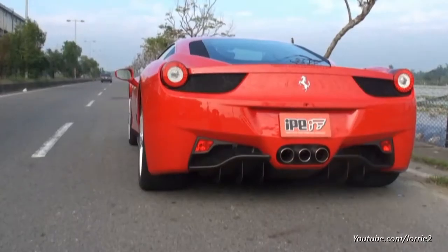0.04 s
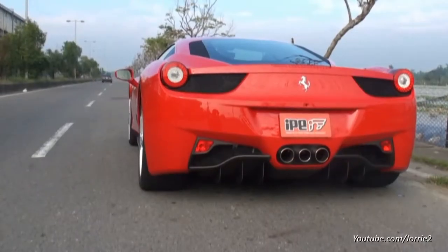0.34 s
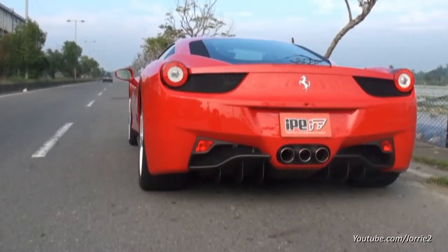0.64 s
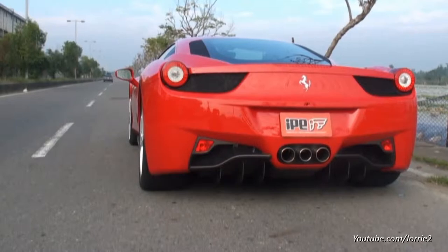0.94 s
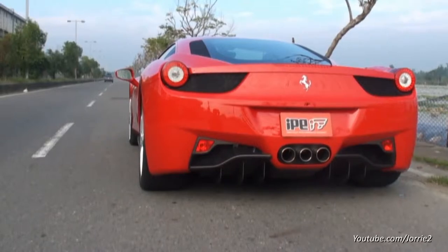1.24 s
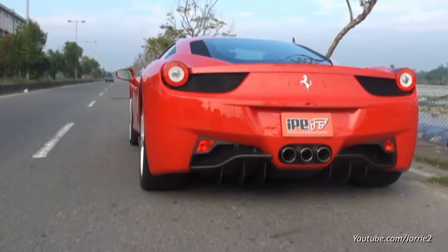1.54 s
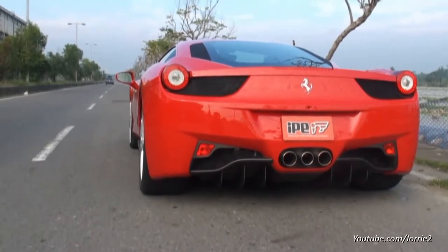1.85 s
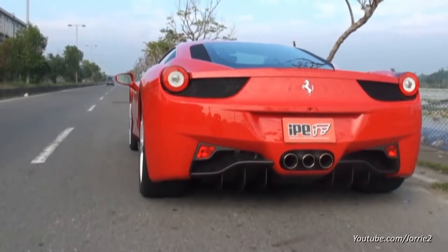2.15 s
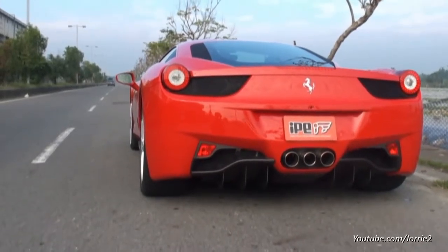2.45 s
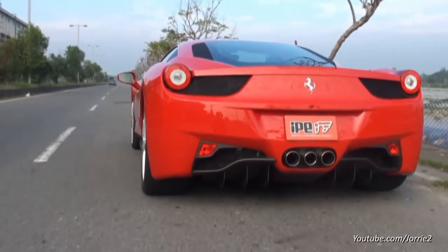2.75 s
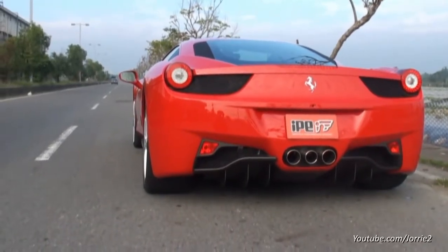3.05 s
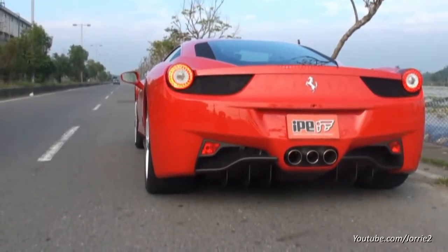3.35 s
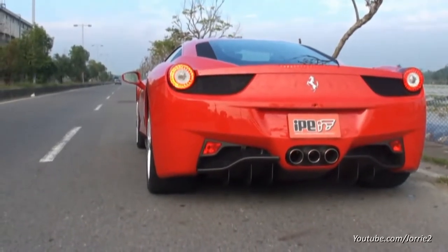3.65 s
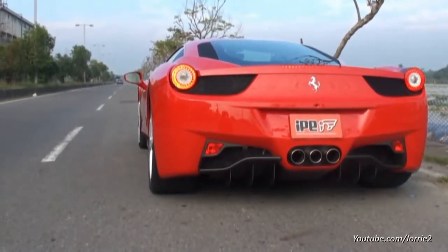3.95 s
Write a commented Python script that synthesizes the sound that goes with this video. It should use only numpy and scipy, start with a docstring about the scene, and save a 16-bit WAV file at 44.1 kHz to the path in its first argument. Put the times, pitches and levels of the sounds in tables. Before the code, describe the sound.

Heard close behind the exhaust by a road, a sports car gives two quick, raspy revs. Each climbs to a crackle, then sinks more slowly into a cluster of pops and an uneven burble.

```python
"""V8 sports car, blipped twice

Heard by a road, from behind the tailpipes. Each time the revs climb, crackle at the top and coast
down; then fuel returns with a cluster of pops and the engine burbles unevenly towards idle.
Firings make the note, turbulent gas the rasp and hiss. A limiter holds the peaks."""
import sys
import numpy as np
from scipy import signal
from scipy.fft import rfft, irfft
from scipy.io import wavfile
from scipy.ndimage import uniform_filter1d, minimum_filter1d, map_coordinates

SR = 44100
rng = np.random.default_rng(int(sys.argv[2]) if len(sys.argv) > 2 else 0)


def log_audio(samples):
    """Write samples as a 16-bit WAV file to the path given in sys.argv[1]."""
    # one column per channel
    frames = np.atleast_2d(samples).T
    # limit to full scale, then quantise
    limited = np.clip(frames, -1, 1)
    pcm = np.round(limited * 32767).astype(np.int16)
    wavfile.write(sys.argv[1], SR, pcm)


N = 176400
T = np.arange(N) / SR

# spells of uneven combustion (start [s], end [s], start level [dB], end level [dB])
BURBLE_SPELLS = [(0, 0.274, -22, -19.5), (0.319, 0.383, -12, -18.5), (1.161, 1.57, -19.5, -28.5),
                 (1.564, 1.932, -25.5, -33), (1.927, 2.328, -45, -51), (2.4, 2.754, -14.5, -36),
                 (2.741, 2.825, -13, -16.5), (3.532, 3.995, -22, -21.5)]
# tailpipe response (frequency [Hz], gain [dB])
TAILPIPE = [(60, -24.5), (170, -6), (450, 2), (605, -6), (685, 1.5), (785, -7), (900, -5), (1050, -5),
            (1230, -9), (1460, -1), (1660, -1), (1770, -13.5), (2020, -7), (2400, -12), (2900, -22),
            (3100, -18.5), (4000, -36), (6000, -36.5), (12000, -78)]
# silencer response (frequency [Hz], gain [dB])
SILENCER = [(25, -30.5), (70, -17), (120, -1), (170, -3), (320, 4), (450, -6.5), (600, -16), (1200, -40),
            (12000, -105)]


def amp(db):
    """Decibels to gain."""
    return 10 ** (np.asarray(db) / 20)


def unit(x):
    """Scale to rms 1."""
    return x / np.sqrt(np.mean(x ** 2) + 1e-20)


def along(points, hz):
    """Read (frequency [Hz], value) points on a log axis."""
    freqs_hz, values = np.transpose(points)
    return np.interp(np.log(hz + 1), np.log(freqs_hz + 1), values)


def during(start_s, end_s, edge_s=0.034):
    """1 between two times, with short ramps."""
    return np.clip(np.minimum(T - start_s, end_s - T) / edge_s + .5, 0, 1)


def wobble(rate_hz):
    """Smooth random curve, rate_hz knots a second."""
    return map_coordinates(rng.standard_normal(2000), [T * rate_hz], mode="wrap")


def impulse(response, size=8192):
    """Minimum-phase impulse response from (frequency [Hz], gain [dB]) points."""
    cepstrum = irfft(np.log(amp(along(response, np.fft.rfftfreq(size, 1 / SR)))))
    cepstrum[1:size // 2] *= 2
    cepstrum[size // 2 + 1:] = 0
    return irfft(np.exp(rfft(cepstrum)))


def colour(x, response):
    """Filter x through a response."""
    return signal.fftconvolve(np.atleast_2d(x), impulse(response)[None], axes=1)[:, :N]


def noise():
    """White stereo noise, nearly mono in the bass."""
    # (frequency [Hz], left-right correlation [-])
    coherence = [(2000, 0.97), (4500, 0.77)]
    angle = np.arccos(along(coherence, np.fft.rfftfreq(N, 1 / SR))) / 2
    mid, side = irfft(rfft(rng.standard_normal((2, N))) * [np.cos(angle), np.sin(angle)], N)
    return np.array([mid + side, mid - side])


def engine():
    """Firing rate [Hz], gliding exponentially, and throttle (0 shut, 1 open)."""
    # (time [s], firing rate [Hz])
    revs = [(0.0, 160.3), (0.08, 240.2), (0.15, 333.2), (0.21, 397.5), (0.3, 484.5), (0.36, 488.6),
            (0.6, 381), (1.0, 256.9), (1.11, 225.9), (1.5, 171.7), (1.64, 148.9), (1.95, 94.4),
            (2.04, 86.17), (2.24, 85.87), (2.33, 94.36), (2.37, 115.5), (2.51, 231.8), (2.58, 328.2),
            (2.65, 404.4), (2.71, 459.6), (2.76, 482.8), (3.07, 357.9), (3.39, 261.8), (3.51, 226.1),
            (3.85, 177.1), (4.0, 154.2)]
    # throttle open (start [s], end [s])
    blips = [(-.1, 0.41), (2.301, 2.815)]
    times_s, rates_hz = np.transpose(revs)
    glide_hz = np.exp(np.interp(T, times_s, np.log(rates_hz)))
    throttle = sum(during(*span, edge_s=0.11) for span in blips)
    return uniform_filter1d(glide_hz, SR // 50, mode="nearest"), throttle


def layer_levels(firing_hz, throttle):
    """Base levels of note, octave, rasp and hiss follow speed and throttle."""
    # throttle open (firing rate [Hz], note [dB], octave [dB], rasp [dB], hiss [dB])
    on_load = [(91.2, -32, -30.5, -39, -58), (106.4, -20, -37.5, -34, -50), (133, -11, -19, -21.5, -39.5),
               (228, -12.5, -13.5, -15.5, -41), (311, -7.5, -20.5, -16, -38.5),
               (450, -11.5, -19.5, -12.5, -34), (503, -12.5, -31, -12.5, -38.5)]
    # throttle shut, same columns
    coasting = [(85.8, -43, -37, -53.5, -60.5), (89.96, -39.5, -33.5, -41.5, -55.5),
                (143, -27, -37.5, -45, -56.5), (167, -21.5, -21.5, -35.5, -55.5),
                (193.08, -15.5, -19, -28.5, -51.5), (203.3, -21, -29.5, -28.5, -48),
                (216.8, -21, -15, -38, -45), (235, -18.5, -33, -32.5, -54.5),
                (279.5, -22, -35.5, -30, -49.5), (353.84, -20, -25.5, -23, -46.5),
                (419.4, -19, -37, -17, -39), (455.7, -12.5, -22.5, -13, -35)]

    def read(table):
        rates_hz, *columns_db = np.transpose(table)
        return np.array([np.interp(firing_hz, rates_hz, db) for db in columns_db])

    return throttle * read(on_load) + (1 - throttle) * read(coasting)


def sputter_db(phase, throttle):
    """Firing strength varies in the louder burbles, throttle shut, and dips as cylinders miss."""
    spells = sum(during(start, end) for start, end, db, _ in BURBLE_SPELLS if db > -36.5)
    strength = np.interp(phase / (2 * np.pi), np.arange(2000), rng.standard_normal(2000))
    misfires = during(1.42, 1.452, edge_s=0.0088) + during(3.828, 3.862, edge_s=0.0088)
    return 2.4 * spells * (1 - throttle) * strength - 9 * misfires


def firing_note(phase, firing_hz, throttle, note_db, octave_db, rasp_db):
    """Firing tone and octave, pipe-shaped overtones, lines from unequal cylinders, idle hum."""
    # falters at peak revs and before fuel returns (start [s], end [s], gain [dB])
    lulls = [(0.343, 0.384, -8.5), (1.094, 1.132, -13.5), (2.755, 2.826, -14), (3.484, 3.55, -7.5)]
    # (multiple of firing rate [-], relative level [dB])
    overtones = [(1.625, -12), (1.875, -8), (2.125, -9.5), (3, -2), (3.625, -8), (4, -2), (5, -4.5)]
    # unequal cylinders (multiple [-], base level at ref_hz [dB], slope with speed [dB/octave])
    undertones = [(.5, -22, 25.5), (.75, -28.5, 18), (.875, -30.5, 25), (1.125, -26.5, 10)]
    ref_hz = 440
    howl_hz, howl_width_hz, howl_db = 1600, 130, 6  # metallic tailpipe resonance
    load_db = -7 * throttle  # lines sink into the rasp under load
    lull_db = sum(db * during(start, end) for start, end, db in lulls)
    falter_db = lull_db + sputter_db(phase, throttle)
    tone = amp(note_db + 1 + falter_db + 1.5 * wobble(60)) * np.cos(phase)
    tone += amp(octave_db + 2 + falter_db + 2.4 * wobble(55)) * np.cos(2 * phase)
    for multiple, db in overtones:
        drift_rad = 7 * rng.random() + .3 * wobble(45) + .25 * wobble(300)
        line = np.cos(multiple * phase + drift_rad) * amp(3 * wobble(35))
        line_hz = multiple * firing_hz
        flare_db = howl_db * np.exp(-((line_hz - howl_hz) / howl_width_hz) ** 2)
        tone += amp(rasp_db + db - 5.5 + along(TAILPIPE, line_hz) + flare_db + load_db) * line
    for multiple, db, db_per_octave in undertones:
        drift_rad = 7 * rng.random() + .15 * wobble(30)
        line = np.cos(multiple * phase + drift_rad) * amp(2 * wobble(18))
        tone += amp(db + db_per_octave * np.log2(firing_hz / ref_hz) + load_db + lull_db / 2) * line
    idle_hum = amp(-36.5 + 2 * wobble(20)) * np.cos(3 * phase + .25 * wobble(25))
    return np.sqrt(2) * (tone + during(1.92, 2.2) * idle_hum)


def puffs(phase, depth):
    """Gas flow swelling once per turn of phase."""
    return unit(np.exp(depth * np.cos(phase)))


def churn(phase, size=512, memory=.9):
    """Turbulence that nearly repeats every eight firings: a dense comb of lines."""
    fresh = rng.standard_normal((300, size))
    cycles = signal.lfilter([np.sqrt(1 - memory ** 2)], [1, -memory], fresh, axis=0)[20:]
    position = phase / (16 * np.pi) * size
    return map_coordinates(cycles.ravel(), [position]) * np.sqrt(np.gradient(position))


def pipe_rasp(phase, throttle, rasp_db):
    """Pulsing turbulence rasps in the pipes, less periodic with the throttle open."""
    repeat_share = .75 - .3 * throttle
    flow = np.sqrt(repeat_share) * churn(phase) + np.sqrt(1 - repeat_share) * noise()
    pulsed = flow * puffs(phase, depth=0.31) * puffs(phase / 4, depth=0.14)
    return unit(colour(pulsed, TAILPIPE)) * amp(rasp_db - 1)


def mouth_hiss(phase, hiss_db):
    """Pulsing turbulence hisses at the pipe mouths."""
    # (frequency [Hz], gain [dB])
    spectrum = [(1200, -26.5), (2800, 0), (4200, -2), (6000, -6.5), (10000, -17.5), (14000, -32)]
    flow = noise() + .8 * churn(phase)
    pulsed = flow * puffs(phase, depth=.25) * amp(.8 * wobble(350))
    return unit(colour(pulsed, spectrum)) * amp(hiss_db + 5 + 0.88 * wobble(40))


def burble(phase):
    """Firings of uneven strength boom in the silencer."""
    firings = np.flatnonzero(np.diff(np.floor(phase / (2 * np.pi))) > 0)
    kicks = np.zeros(N)
    kicks[firings] = rng.uniform(-0.8, 1, len(firings)) * np.sqrt(np.gradient(firings))
    envelope = sum((T >= start) * (T < end) * amp(np.interp(T, [start, end], ramp_db))
                   for start, end, *ramp_db in BURBLE_SPELLS)
    return colour(unit(kicks) * envelope, SILENCER) / np.linalg.norm(impulse(SILENCER))


def pops(front_s=0.0012, tail_db=-3, t60_s=0.085):
    """Unburnt fuel goes off in the pipe: a thump and a hard-fronted crack."""
    # (time [s], thump [dB], crack [dB])
    ignitions = [(0.37, -20, -18), (1.139, -2.5, -19), (1.148, 1, -15), (1.161, -7, -6),
                 (1.171, -7.5, -10.5), (1.207, -4, -17.5), (1.226, -1, -18), (1.247, -6.5, -25.5),
                 (1.289, -15, -22.5), (1.461, -5, -28), (2.753, 0, -14), (3.53, -2, -14.5),
                 (3.544, -5.5, -15), (3.558, -3.5, -8.5), (3.574, -10, -14), (3.594, -4, -16.5),
                 (3.652, -8.5, -17)]
    kicks, envelope = np.zeros(N), np.zeros(N)
    for time_s, thump_db, crack_db in ignitions:
        kicks[round(time_s * SR)] = amp(thump_db)
        age_s = np.abs(T - time_s)
        decay = np.exp(-age_s / front_s) + amp(tail_db - 60 * age_s / t60_s)
        envelope += (T >= time_s) * amp(crack_db) * decay
    thumps = colour(kicks, SILENCER) / np.abs(impulse(SILENCER)).max()
    cracks = colour(envelope * noise(), TAILPIPE) / np.linalg.norm(impulse(TAILPIPE))
    return thumps + cracks


def swell(centre_s, width_s):
    """Gaussian envelope, width_s wide at 1/e."""
    return np.exp(-(2 * (T - centre_s) / width_s) ** 2)


def crackle():
    """Sprays of tiny snaps at the pipe mouths as the throttle shuts."""
    # (centre [s], width [s], level [dB])
    sprays = [(0.372, 0.039, -24.5), (2.758, 0.026, -26), (2.814, 0.023, -16.5)]
    # (frequency [Hz], gain [dB])
    spectrum = [(900, -31), (2500, 12), (5300, -0.5), (15000, -48)]
    snaps = unit(noise() * amp(7 * wobble(900)))
    envelope = sum(amp(db) * swell(centre_s, width_s) for centre_s, width_s, db in sprays)
    return colour(snaps * envelope, spectrum) / np.linalg.norm(impulse(spectrum))


def squeak():
    """Short fuzzy ring of hot exhaust metal."""
    # (centre [s], width [s], pitch [Hz], level [dB])
    rings = [(2.452, 0.065, 4370, -32)]
    fuzz_rad = 2.6 * wobble(700)
    return sum(amp(db) * swell(centre_s, width_s) * np.sin(2 * np.pi * hz * T + fuzz_rad)
               for centre_s, width_s, hz, db in rings)


def roadside(car, t60_s=0.14, wet_db=-19, air_db=-39):
    """Faint scatter from road, verge and trees, plus steady outdoor noise."""
    # (frequency [Hz], gain [dB])
    air_spectrum = [(25, -18.5), (150, 3), (900, 0), (1700, -3.5), (3000, -24.5), (9500, -25.5),
                    (13000, -37)]
    scatter_spectrum = [(100, -22), (600, 13.5), (3000, 12.5), (10000, -13)]
    tail = colour(rng.standard_normal((2, N)), scatter_spectrum) * amp(-60 * T / t60_s)
    tail = tail[:, :SR // 2]
    scatter = signal.fftconvolve(car, tail / np.linalg.norm(tail[0]), axes=1)[:, :N]
    air = unit(colour(noise(), air_spectrum))
    return amp(wet_db) * scatter + amp(air_db) * air


def scene(pan_db=1.08):
    """The car by the road, exhaust slightly to the right."""
    firing_hz, throttle = engine()
    note_db, octave_db, rasp_db, hiss_db = layer_levels(firing_hz, throttle)
    phase = 2 * np.pi * np.cumsum(firing_hz) / SR
    rasp = pipe_rasp(phase, throttle, rasp_db)
    hiss = mouth_hiss(phase, hiss_db)
    note = firing_note(phase, firing_hz, throttle, note_db, octave_db, rasp_db)
    exhaust = note + rasp + burble(phase) + pops() + squeak()
    car = exhaust * amp([[-pan_db], [pan_db]]) + hiss + crackle()
    return car + roadside(car)


def record(dry, ceiling=0.81, hold_s=0.0044, cutoff_hz=15750):
    """Fast limiter, edge fades, brick-wall low-pass."""
    window = int(hold_s * SR)
    gain = np.minimum(1, ceiling / (np.abs(dry).max(axis=0) + 1e-9))
    limited = dry * uniform_filter1d(minimum_filter1d(gain, window), window)
    faded = limited * during(.002, N / SR - .002, edge_s=.004)
    passband = np.fft.rfftfreq(2 * N, 1 / SR) < cutoff_hz
    return irfft(rfft(faded, 2 * N) * passband)[:, :N]


dry = scene()
out = record(dry)
log_audio(out)
```